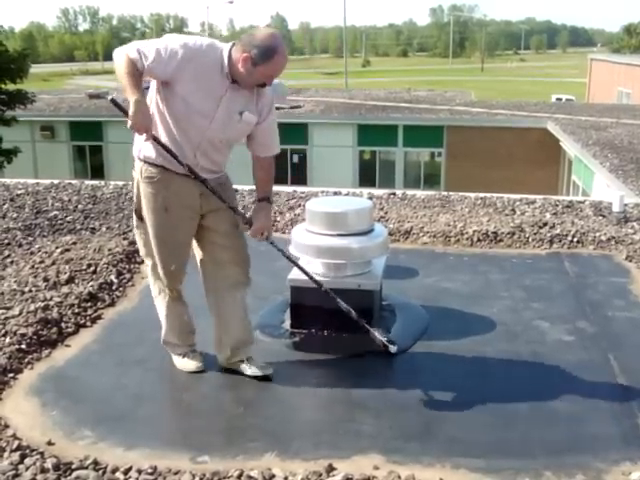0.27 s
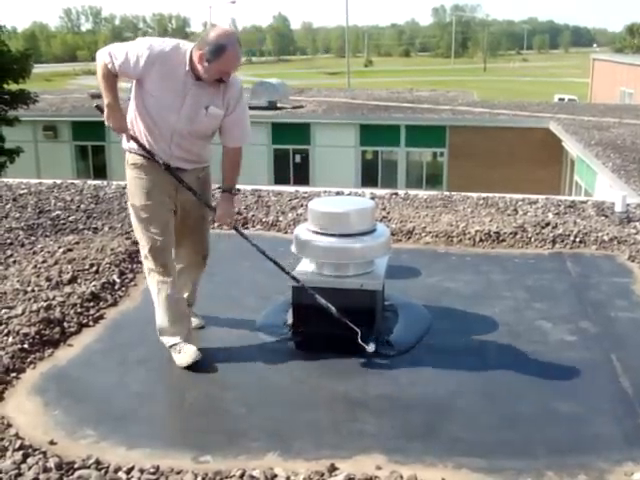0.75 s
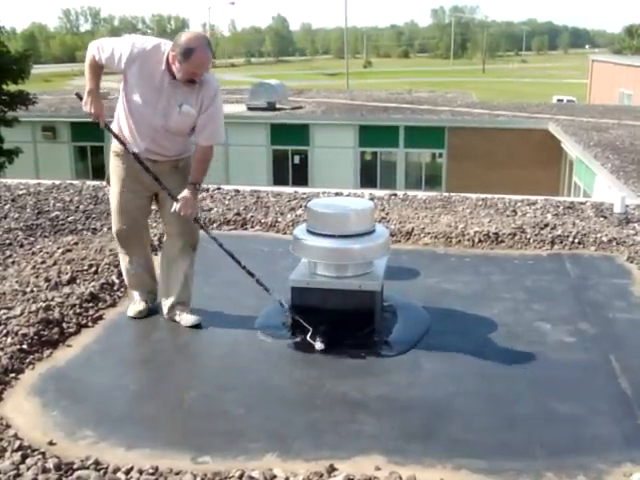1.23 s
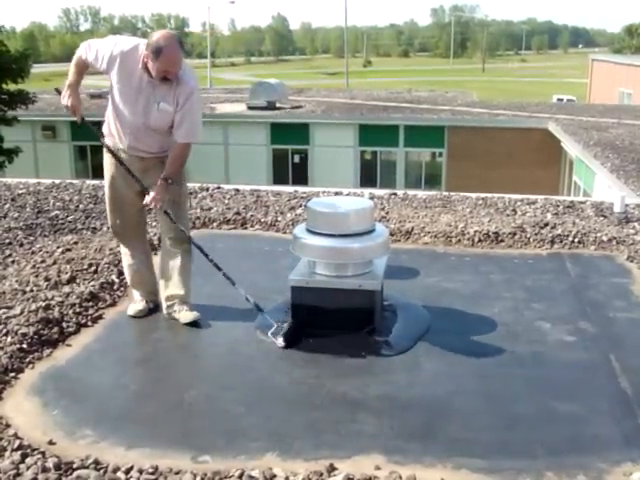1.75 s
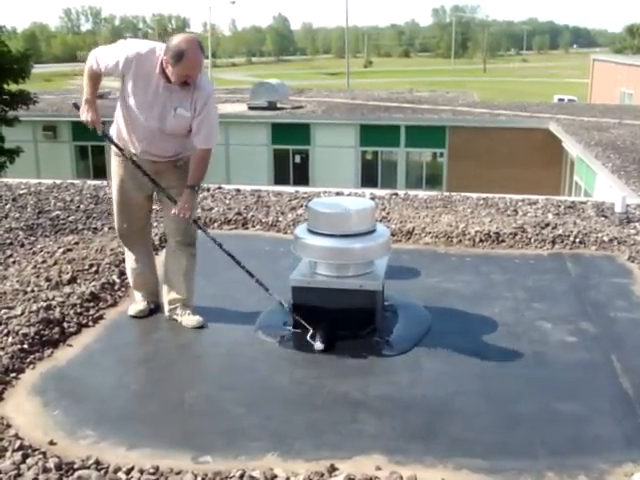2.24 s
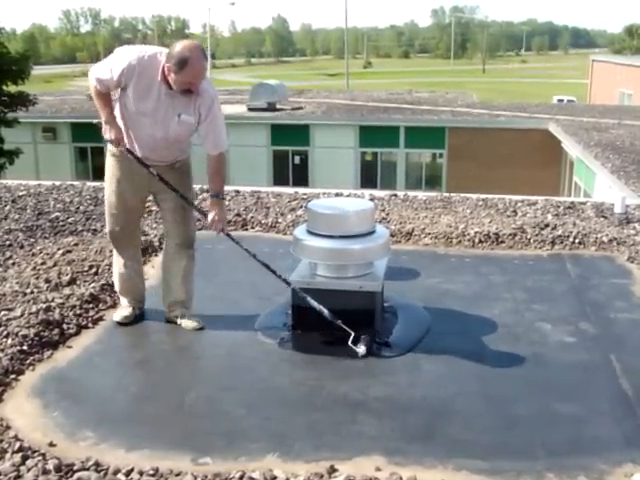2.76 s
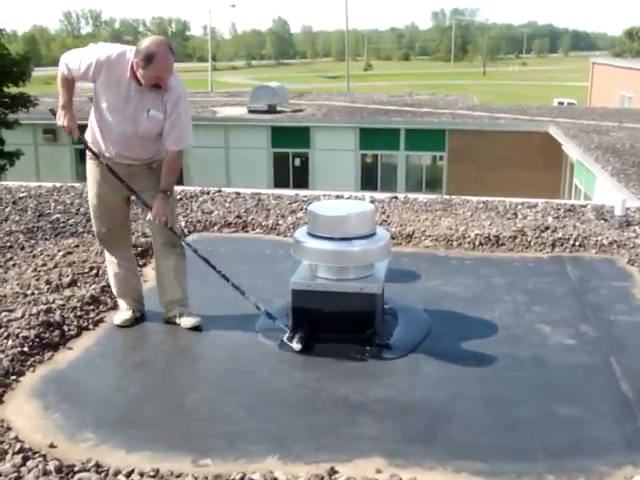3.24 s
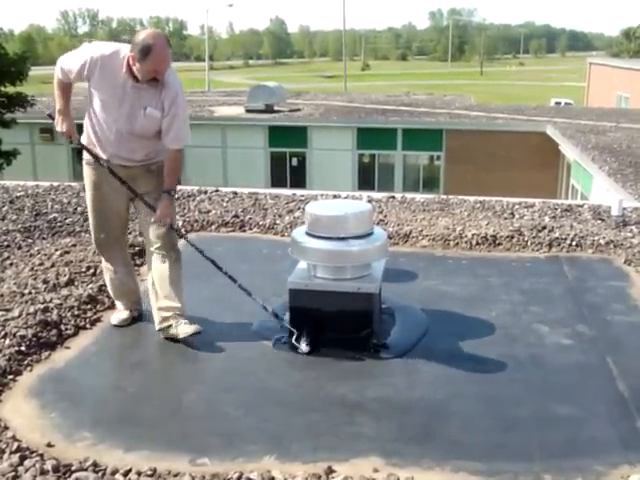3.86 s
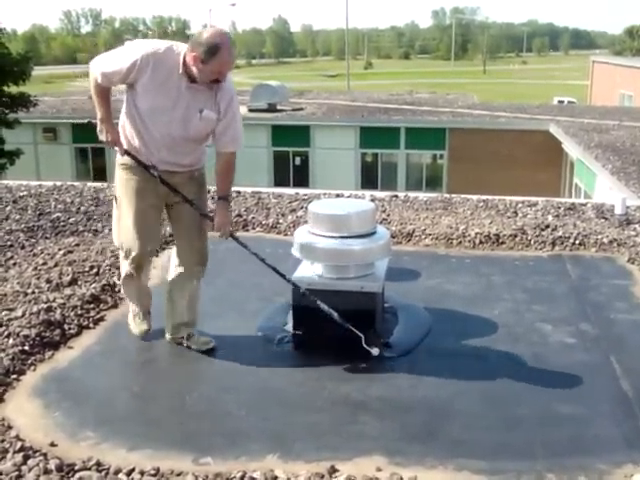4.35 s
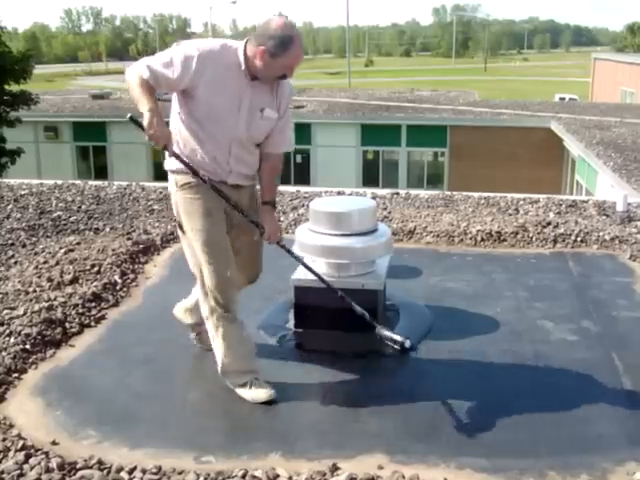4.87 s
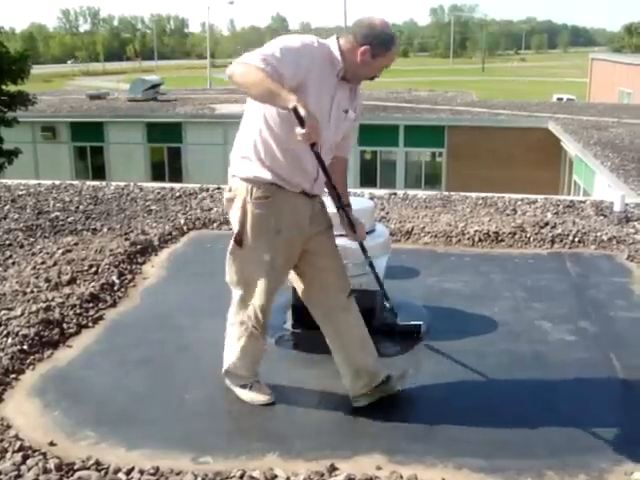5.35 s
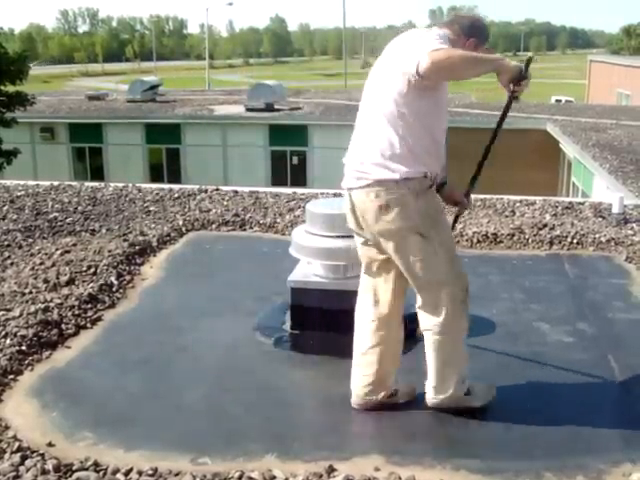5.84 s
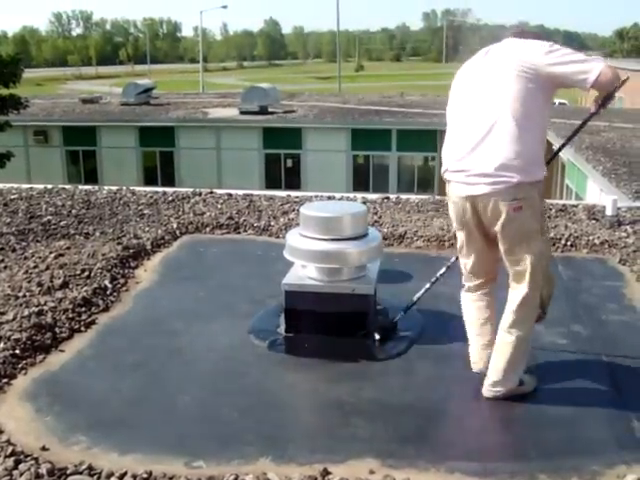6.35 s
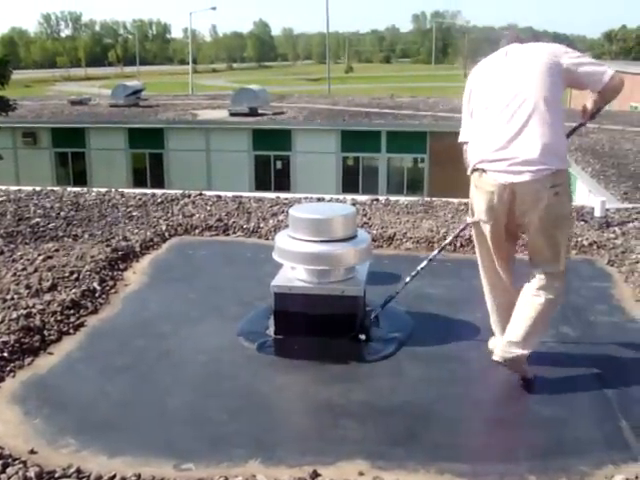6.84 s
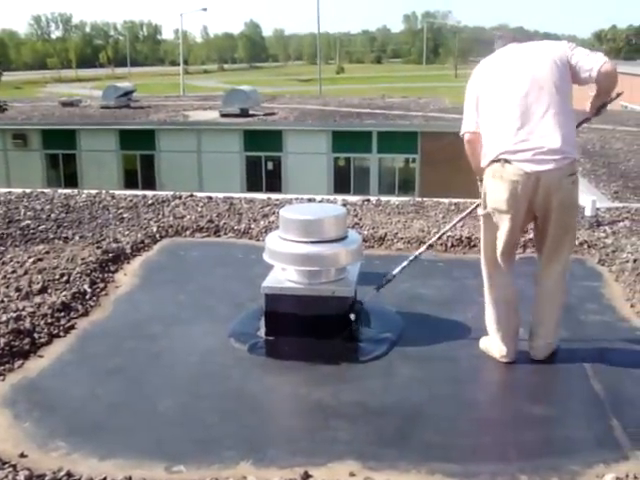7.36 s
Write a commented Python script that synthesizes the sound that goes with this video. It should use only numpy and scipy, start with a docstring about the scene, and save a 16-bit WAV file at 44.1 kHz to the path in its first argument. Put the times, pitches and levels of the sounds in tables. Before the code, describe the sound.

A close, rapidly thrumming motor hum and a fluttering high whine sit over the airy rush of rooftop fans in the open air. Light work sounds come through: first a scuff and two dull steps with cracking grit, then a stretch of mostly fan noise. In the second half a roller pole knocks a few times and creaks briefly, among further footsteps and scrapes of shoes and roller.

```python
"""On a flat roof, ventilation fans make a turbulent rush of air. Close by, a small mechanism whines,
and ticks and thrums about 27.5 times a second as periodic pulses keep its housing ringing.
Someone rolls a coating around a vent: shoes and roller scuff by friction, grit cracks under the
soles, steps thud, and the roller's pole rings in its damped modes as it knocks and creaks."""
import sys
import numpy as np
from scipy import signal
from scipy.fft import rfft, irfft, next_fast_len
from scipy.io import wavfile

SR = 44100
rng = np.random.default_rng(int(sys.argv[2]) if len(sys.argv) > 2 else 0)


def put_to_file(sound):
    """Save the sound as 16-bit audio at rate SR, in the file named by the first command-line argument."""
    columns = np.atleast_2d(sound).T  # one column per channel
    safe = np.clip(columns, -1, 1)
    whole_steps = np.round(safe * 32767)
    wavfile.write(sys.argv[1], SR, whole_steps.astype(np.int16))


N = 335160
TIME = np.arange(N) / SR

# Speed of a small, close, ticking mechanism. Each row: time in seconds, turns per second.
MECHANISM_SPEED = [(0.0, 27.242), (0.77, 27.786), (1.36, 27.467), (2.58, 27.349), (3.04, 27.853),
                   (3.38, 27.32), (4.11, 27.7), (4.78, 27.141), (5.94, 27.889), (6.34, 27.673),
                   (6.91, 26.905), (7.6, 27.914)]
# Pulses of one turn. Each row: place in the turn (0-1), low and high edge in Hz, signed peak pressure.
MECHANISM_PULSES = [(0.177, 191, 453, 0.027), (0.53, 128, 242, 0.058), (0.839, 199, 487, -0.059)]
# Resonances of the small mechanism's housing. Each row: frequency in Hz, bandwidth in Hz, gain in dB.
HOUSING_MODES = [(137, 3.1, -4.5), (158.7, 38, -4.5), (248.2, 9.3, -2.5), (353.6, 3.9, -2.5), (412, 26, -4),
                 (446, 49, -4)]
# Steady motor tones. Each row: frequency in Hz, rms level in dB.
MOTOR_TONES = [(42.5, -51), (55, -48), (85, -48), (99.8, -50.5), (320, -53), (7864.3, -61)]
# The whine's phase jump per turn. Each row: time in seconds, jump in cycles (0 is pure, a half flutters).
WHINE_JUMPS = [(0.25, -.03), (0.4, -.45), (3.6, -0.54), (4.0, -.01), (4.7, -0.028), (4.88, -0.5),
               (5.15, 0.005), (5.55, -.07), (5.8, -.55), (6.35, -.08), (6.6, -0.28), (7.0, -0.24)]
# Spectra of the air noise. Each row: frequency in Hz, relative spectral density in dB.
RUMBLE_SPECTRUM = [(20, -4), (45, -4), (70, 8), (110, 4), (170, 6.5), (260, 4.5), (330, -2.5), (480, 6.5),
                   (560, -12), (800, -26)]
RUSH_SPECTRUM = [(450, -19.5), (600, -3), (750, 2), (1100, 2), (1450, 2), (1650, -3), (1850, -11),
                 (2150, -15.5), (2900, -21), (3500, -21.5)]
HISS_SPECTRUM = [(1500, 7), (2300, 1), (3050, 3.5), (3450, -9), (4000, -2.5), (5500, -7), (7000, -6.5),
                 (9000, -9), (10600, -11.5), (11400, -20)]
# Swell of the duct resonance and of the broad rush. Each row: time in seconds, relative level in dB.
DUCT_LEVELS = [(0.0, -36), (0.44, -37), (1.16, -33), (1.54, -37), (3.17, -33.5), (4.1, -36.5), (4.87, -29),
               (5.86, -33), (6.52, -31.5), (6.82, -36), (7.43, -38), (7.6, -45)]
RUSH_LEVELS = [(0.0, -37), (0.78, -36.5), (2.12, -39.5), (4.34, -36.5), (4.72, -33.5), (7.22, -35.5),
               (7.6, -32.5)]
# Strokes of shoes and roller. Each row: peak time and half length in seconds, centre in Hz, level in dB.
SCUFF_STROKES = [(0.242, 0.034, 3500, -45.5), (.68, .025, 4200, -50), (2.94, .05, 3800, -52.5),
                 (4.416, 0.021, 5000, -43), (4.6, .25, 4300, -56.5), (5.72, 0.027, 2900, -43),
                 (6.039, 0.019, 3850, -43.5), (7.44, 0.14, 2460, -46.5)]
# Short bright cracks: stones crushed under a sole, and at 4.30 s the crack of a pole knock. Each row: start in
# seconds, relative level in dB.
CRACKS = [(0.4369, -32), (0.4708, -31), (4.1959, -31), (4.3016, -29), (4.3425, -34), (4.5256, -35),
          (5.1886, -31.5), (7.0928, -34), (7.3622, -32)]
# Footsteps. Each row: peak time and half length in seconds, thud level in dB.
FOOTSTEPS = [(0.486, .06, -32), (.75, .05, -37), (4.197, 0.018, -31), (4.406, 0.14, -32.5),
             (7.1, .035, -35)]
# Knocks of the pole. Each row: start in seconds, strength in dB, hardness in dB.
POLE_KNOCKS = [(4.302, -13, 0), (4.427, -10.5, 2.5), (4.708, -2.5, -1.5), (4.767, -10.5, -2),
               (6.101, -5, 6.5)]
# Modes of the pole. Each row: frequency in Hz, bandwidth in Hz, relative gain in dB.
POLE_MODES = [(195, 110, -0.5), (363, 180, 5.5), (864, 540, -4.5), (1254, 690, -4), (2920, 530, -1.5),
              (3950, 480, -3.5), (5430, 1800, -28)]
# Creaks of the pole. Each row: start and length in seconds, first and last slips per second,
# unevenness (0-1), initial strength in dB, hardness in dB.
POLE_CREAKS = [(6.022, .026, 370, 290, 0.21, -14, 2), (6.683, .067, 150, 80, .03, -9, 1.5)]


def from_db(db):
    """Decibels to amplitude gain."""
    return 10 ** (np.asarray(db) / 20)


def rms_one(x):
    """Scale to unit power."""
    return x / np.sqrt(np.mean(x ** 2) + 1e-20)


def in_time(curve):
    """Linear interpolation of a curve at every sample."""
    return np.interp(TIME, *np.transpose(curve))


def drift(rate_hz):
    """Low-passed noise of unit spread wanders about `rate_hz` times a second."""
    hop, warm_up = 40, 2000
    r = np.exp(-2 * np.pi * hop * rate_hz / SR)
    slow = signal.lfilter([1], [1, -2 * r, r * r], rng.standard_normal(N // hop + warm_up + 2))[warm_up:]
    return np.interp(np.arange(N) / hop, np.arange(len(slow)), rms_one(slow))


def noise(spectrum):
    """Noise of unit power with the given spectrum, falling away beyond its ends."""
    hz, db = np.transpose(spectrum)
    size = next_fast_len(N)
    f = np.maximum(np.arange(size // 2 + 1) * SR / size, 1)
    skirts = np.minimum(f / hz[0], 1) ** 2 * np.minimum(hz[-1] / f, 1) ** 4
    gain = from_db(np.interp(np.log(f), np.log(hz), db)) * skirts
    return rms_one(irfft(rfft(rng.standard_normal(size)) * gain, size)[:N])


def band(x, low_hz, high_hz, order=2):
    """Butterworth band-pass."""
    sos = signal.butter(order, [low_hz, high_hz], "band", fs=SR, output="sos")
    return signal.sosfilt(sos, x + 1e-18)


def impulses(times, sizes):
    """A train of single-sample impulses."""
    out = np.zeros(N)
    out[np.clip(np.round(times * SR).astype(int), 0, N - 1)] = sizes
    return out


def struck(times, sizes, low_hz, high_hz):
    """Impulse response of a damped resonator: each strike peaks at its size and dies away."""
    unit_peak = np.abs(band(signal.unit_impulse(SR // 20), low_hz, high_hz)).max()
    return band(impulses(times, sizes), low_hz, high_hz) / unit_peak


def bursts(times, db, decay_s, low_hz, high_hz):
    """Band noise with sudden onsets and exponential decay."""
    envelope = signal.lfilter([1], [1, -np.exp(-1 / (decay_s * SR))], impulses(times, from_db(db)) + 1e-18)
    return envelope * rms_one(band(rng.standard_normal(N), low_hz, high_hz))


def swell(peak_s, half_s):
    """A Gaussian envelope of height 1."""
    return np.exp(-.5 * np.minimum(((TIME - peak_s) / half_s) ** 2, 100))


def mechanism(vary_db):
    """Periodic forcing: ticks recur each turn and keep a small housing ringing; their harmonics drone."""
    turns = np.cumsum(in_time(MECHANISM_SPEED)) / SR
    pulses = np.zeros(N)
    for place, low_hz, high_hz, height in MECHANISM_PULSES:
        times = np.interp(np.arange(place, turns[-1], 1), turns, TIME)
        sizes = height * from_db(vary_db * rng.standard_normal(len(times)))
        pulses += struck(times, sizes, low_hz, high_hz)
    housing = sum(from_db(db) * band(pulses, hz - width / 2, hz + width / 2, order=1)
                  for hz, width, db in HOUSING_MODES)
    return pulses + housing


def motors(whine_hz, whine_db, turns_per_s, settle_s):
    """Phase modulation: a jump each turn spreads the whine into close sidebands, over steady tones."""
    turn_times = np.arange(0, N / SR, 1 / turns_per_s)
    jumps = np.interp(turn_times, *np.transpose(WHINE_JUMPS))
    phasor = np.exp(-2j * np.pi * np.cumsum(impulses(turn_times, jumps)))
    settle = np.exp(-1 / (settle_s * SR))
    smoothed = signal.lfilter([1 - settle], [1, -settle], phasor)
    whine = np.real(smoothed * np.exp(2j * np.pi * whine_hz * TIME))
    tones = sum(from_db(db) * np.sin(2 * np.pi * hz * TIME) for hz, db in MOTOR_TONES)
    return np.sqrt(2) * (from_db(whine_db) * whine + tones)


def air(rumble_db, lumpy_db, duct_hz, duct_width_hz, rush_gain_db, hiss_db):
    """Turbulence radiates broadband noise: rumble, rush and hiss, with a hollow duct resonance."""
    rush_level = in_time(RUSH_LEVELS)
    swing_db = 0.47 * (rush_level - rush_level.mean())  # the rumble partly follows the rush
    rumble = from_db(rumble_db + swing_db + lumpy_db * drift(rate_hz=3.7)) * noise(RUMBLE_SPECTRUM)
    hollow = band(noise(RUSH_SPECTRUM), duct_hz - duct_width_hz / 2, duct_hz + duct_width_hz / 2, order=1)
    duct = from_db(in_time(DUCT_LEVELS)) * rms_one(hollow)
    rush = from_db(rush_level + rush_gain_db) * noise(RUSH_SPECTRUM)
    return rumble + duct + rush + from_db(hiss_db) * noise(HISS_SPECTRUM)


def scuffs(grain_db, edge_ratio):
    """Sliding friction makes a grainy hiss that swells and fades with each stroke."""
    grains = rng.standard_normal(N) * from_db(grain_db * drift(rate_hz=84))
    return sum(from_db(db) * swell(peak_s, half_s) * rms_one(band(grains, hz / edge_ratio, hz * edge_ratio))
               for peak_s, half_s, hz, db in SCUFF_STROKES)


def grit(gain_db):
    """Brittle fracture: each crushed stone, and one knock of the pole, gives a short bright crack."""
    times, db = np.transpose(CRACKS)
    return bursts(times, db + gain_db, decay_s=0.0028, low_hz=3040, high_hz=6100)


def footsteps(crunch_db, spread_db, grains_per_s):
    """Impact: each step thuds on the roof while the sole crushes grains at random instants."""
    weight = sum(from_db(db) * swell(peak_s, half_s) for peak_s, half_s, db in FOOTSTEPS)
    thud = weight * rms_one(band(rng.standard_normal(N), low_hz=77.4, high_hz=343))
    contact = sum(swell(peak_s, 1.27 * half_s) for peak_s, half_s, _ in FOOTSTEPS)  # outlasts the thud
    crushed = rng.random(N) < grains_per_s * contact / SR
    grain_db = crunch_db + spread_db * rng.uniform(-1, 1, N)
    return thud + bursts(TIME[crushed], grain_db[crushed], decay_s=0.0021, low_hz=3180, high_hz=5460)


def pole(strikes, rattle_db, boom_db, ping_db, contact_hz):
    """Modal vibration: a soft knock or slip favours the pole's low modes, a hard one its high modes."""
    times, middle_db, hardness_db = np.transpose(strikes)
    low_db = middle_db - 14.5 - hardness_db
    high_db = middle_db - 18.5 + hardness_db
    # By a square law, mainly the strongest knocks rattle the frame, boom the roof and ping the tube.
    rattle = bursts(times, rattle_db + 2 * (middle_db - middle_db.max()),
                    decay_s=0.004, low_hz=900, high_hz=4900)
    boom = struck(times, from_db(boom_db + 2 * (low_db - low_db.max())), low_hz=130, high_hz=181)
    ping = struck(times, from_db(ping_db + 2 * (high_db - high_db.max())), low_hz=2360, high_hz=2700)
    ringing = rattle + boom + ping
    for k, (hz, width, db) in enumerate(POLE_MODES):
        drive_db = low_db if hz < 500 else middle_db if hz < 2000 else high_db
        ringing += (-1) ** k * struck(times, from_db(drive_db + db), hz - width / 2, hz + width / 2)
    # A slightly yielding contact dulls the treble.
    return signal.sosfilt(signal.butter(4, contact_hz, fs=SR, output="sos"), ringing)


def creak_slips(fade_db):
    """Stick-slip friction: a run of small knocks slows and weakens as the strain runs out."""
    slips = []
    for start, length, first_rate, last_rate, uneven, db, hardness in POLE_CREAKS:
        progress = 0
        for jitter in rng.standard_normal(size=24):
            if progress < 1:
                slips.append((start + progress * length, db - fade_db * progress ** 2, hardness))
                rate = first_rate + (last_rate - first_rate) * progress
                progress += (1 + uneven * jitter) / (length * rate)
    return slips


def scene():
    """Superposition in the open air: mechanism, airflow and roof work add without reverberation."""
    drone = mechanism(vary_db=1.0)
    whine = motors(whine_hz=7703.5, whine_db=-47.0, turns_per_s=28.7, settle_s=0.0004)
    airflow = air(rumble_db=-36.5, lumpy_db=1.0, duct_hz=894, duct_width_hz=173,
                  rush_gain_db=2.0, hiss_db=-47.5)
    strikes = list(POLE_KNOCKS) + creak_slips(fade_db=4)
    knocks = pole(strikes, rattle_db=-20.5, boom_db=-18.0, ping_db=-15.5, contact_hz=6800)
    steps = footsteps(crunch_db=-45.0, spread_db=5, grains_per_s=70)
    cracks = grit(gain_db=-5.0)
    rubbing = scuffs(grain_db=3.0, edge_ratio=1.34)
    return (drone + whine + airflow + knocks + steps + cracks + rubbing)[None]


def record(dry, cutoff_hz=11500, offset=-0.069):
    """A steep low-pass filter cuts the top, and a constant offset shifts the waveform."""
    return signal.sosfilt(signal.ellip(10, .1, 80, cutoff_hz, fs=SR, output="sos"), dry) + offset


dry = scene()
out = record(dry)
put_to_file(out)
```